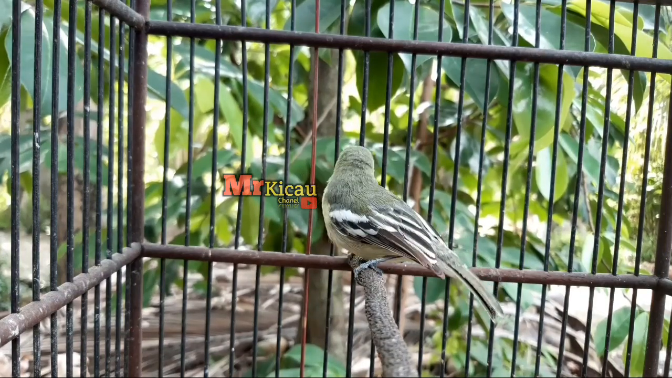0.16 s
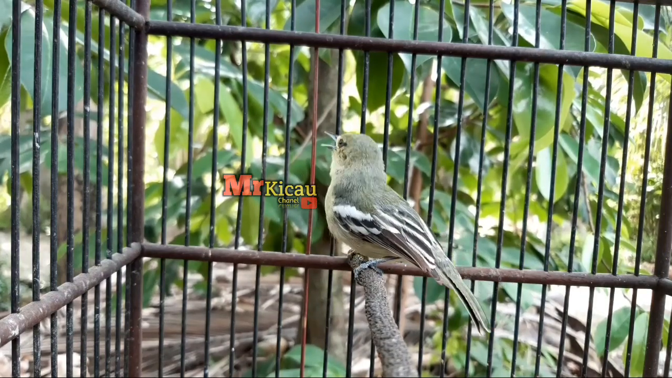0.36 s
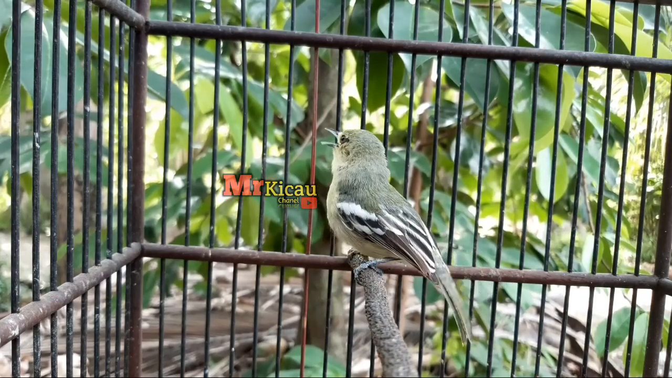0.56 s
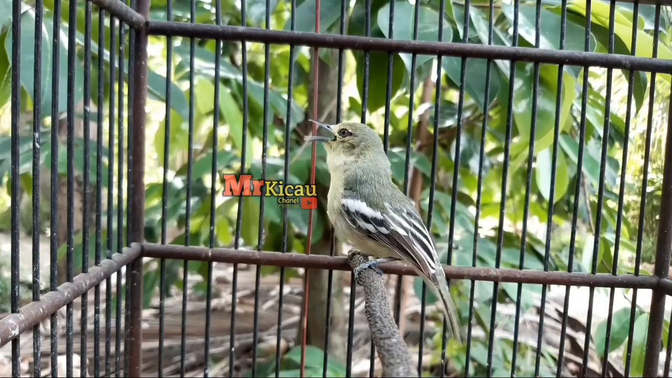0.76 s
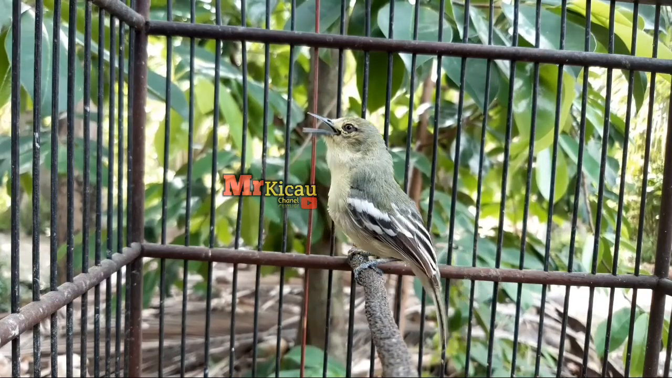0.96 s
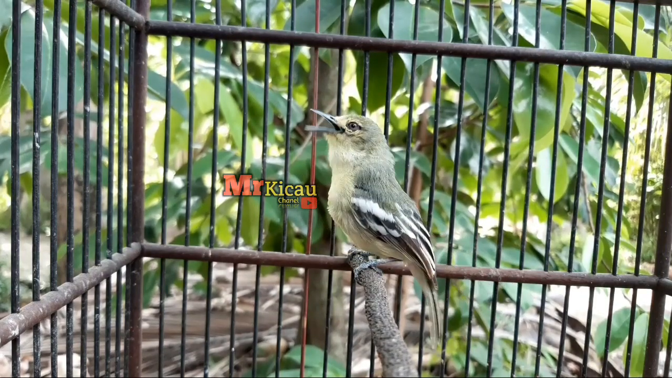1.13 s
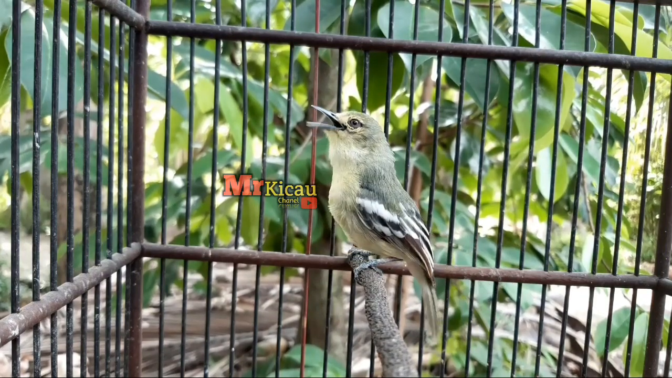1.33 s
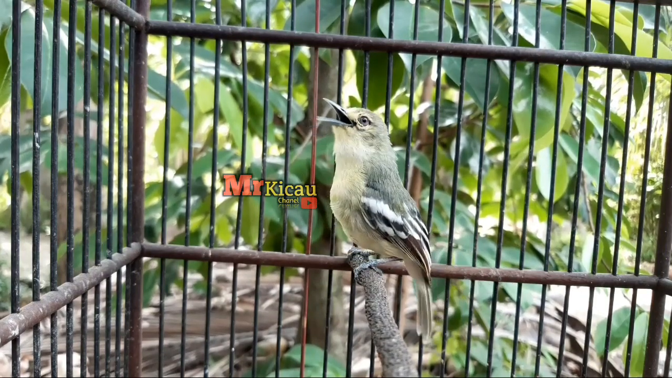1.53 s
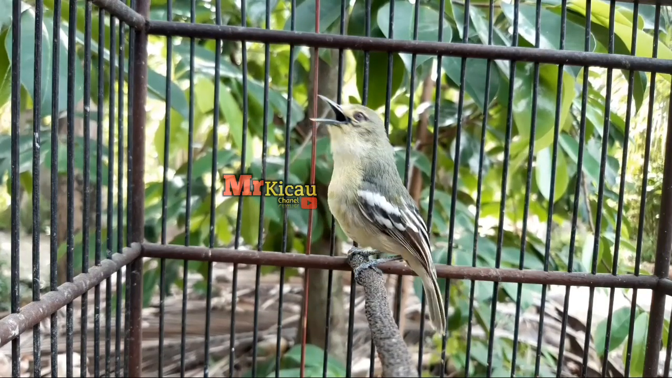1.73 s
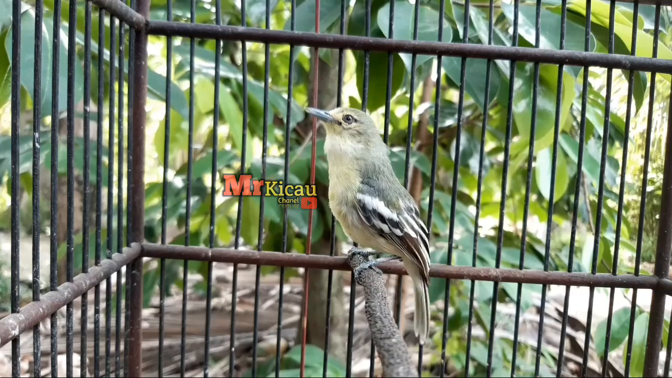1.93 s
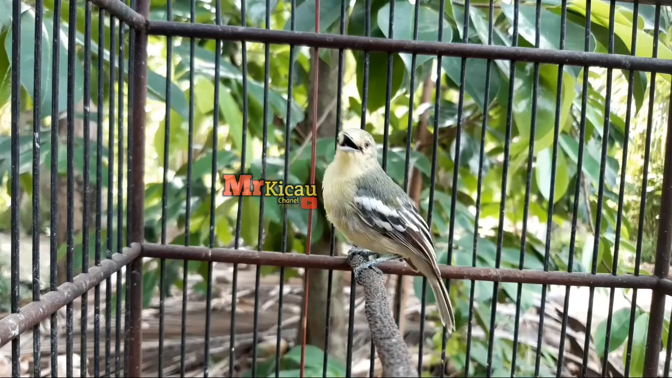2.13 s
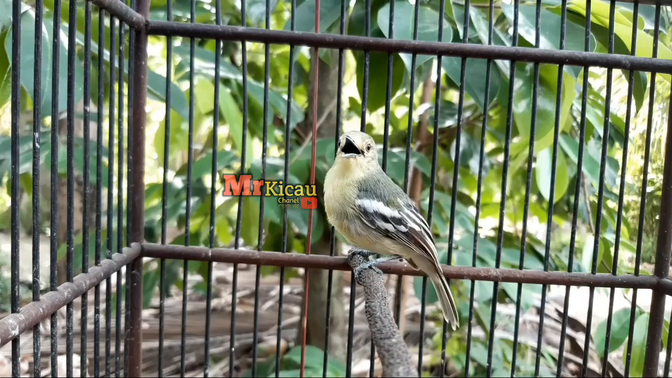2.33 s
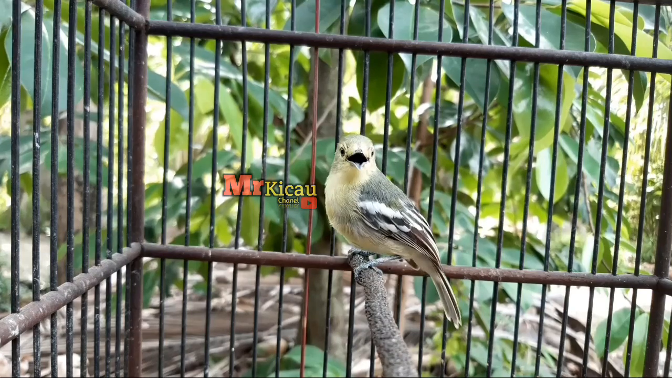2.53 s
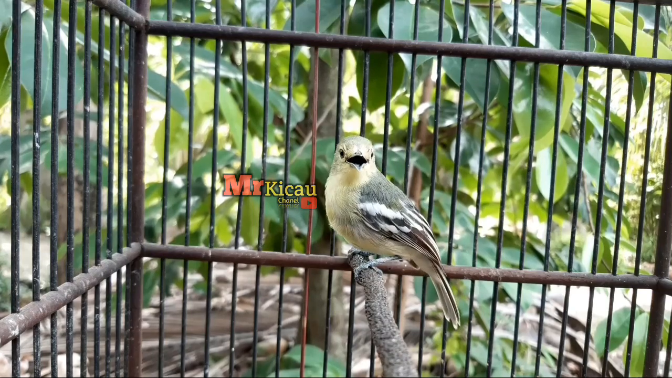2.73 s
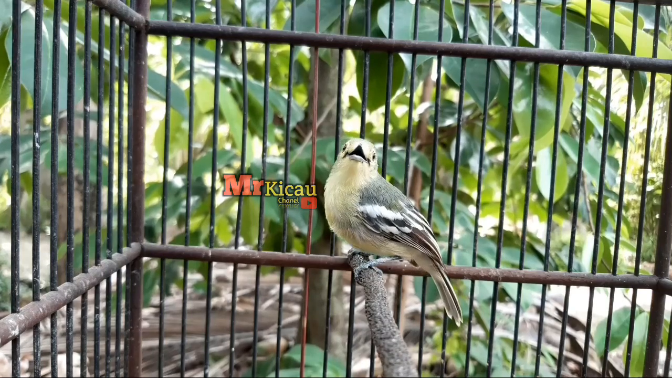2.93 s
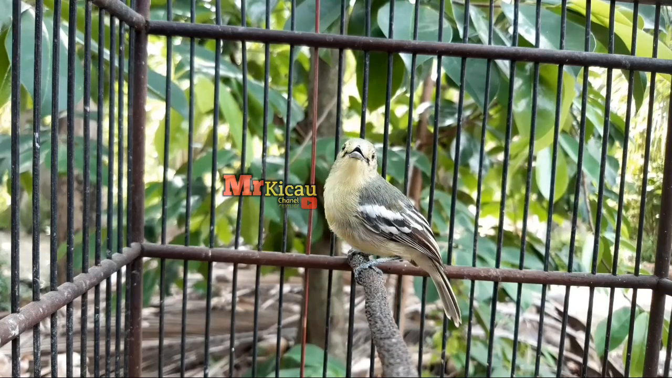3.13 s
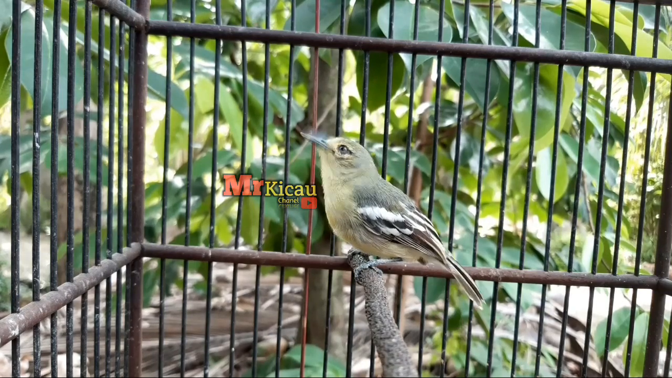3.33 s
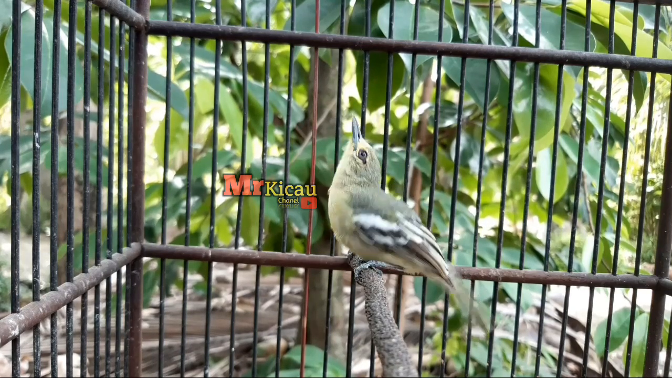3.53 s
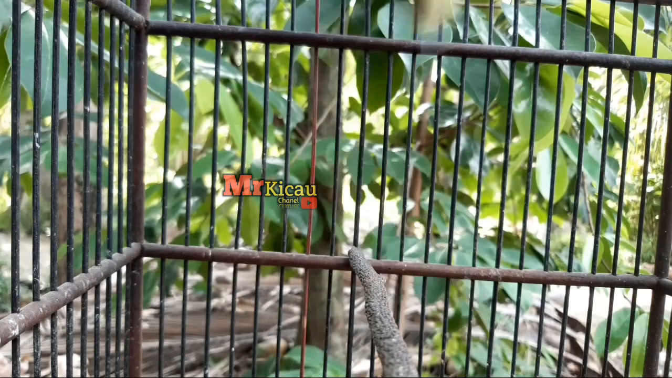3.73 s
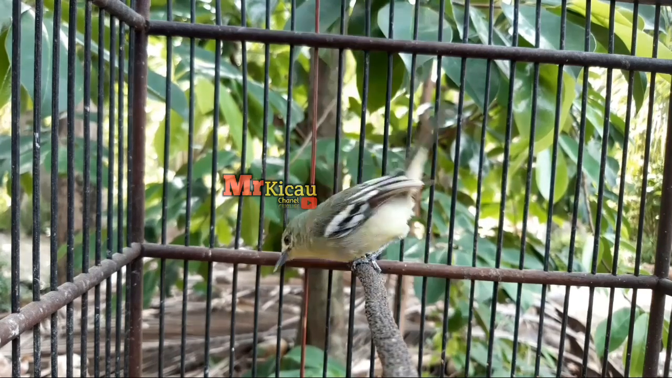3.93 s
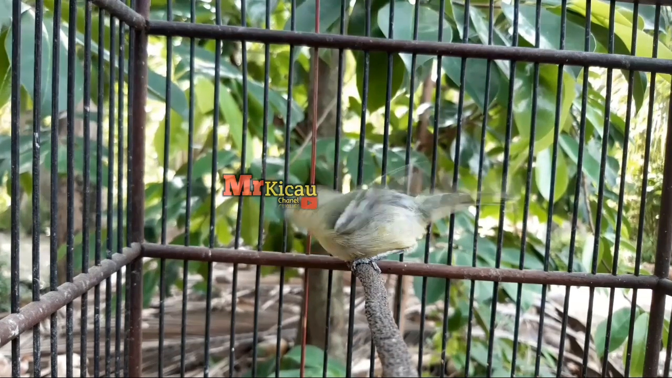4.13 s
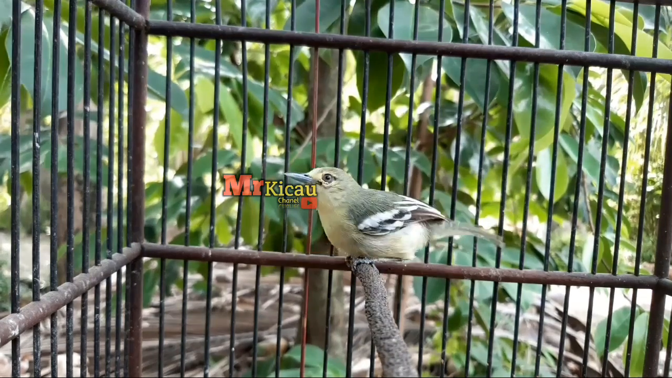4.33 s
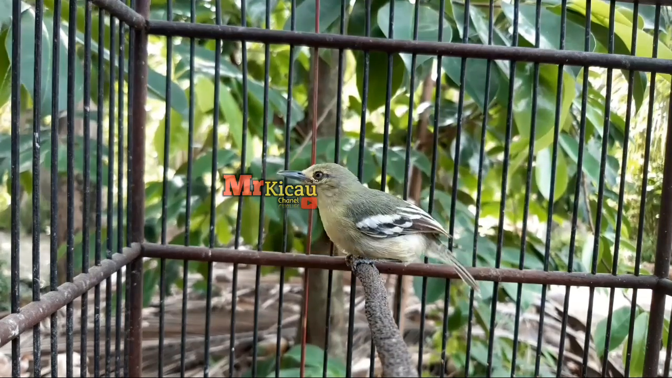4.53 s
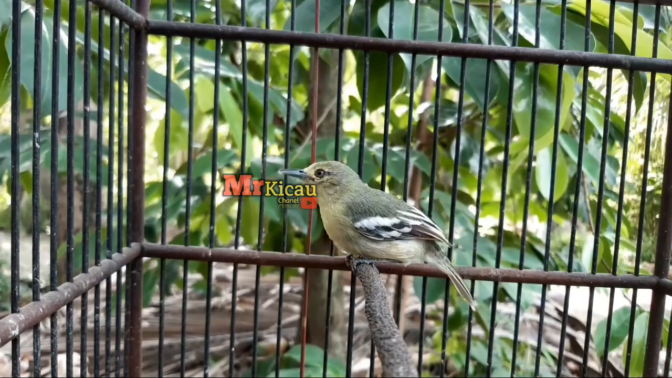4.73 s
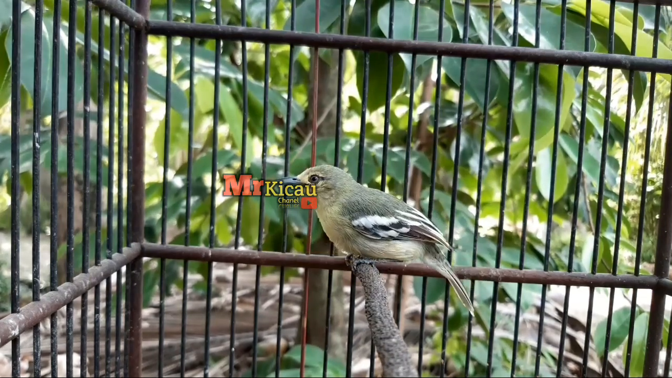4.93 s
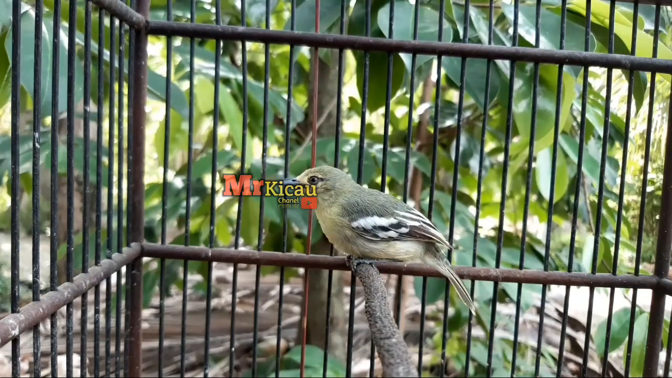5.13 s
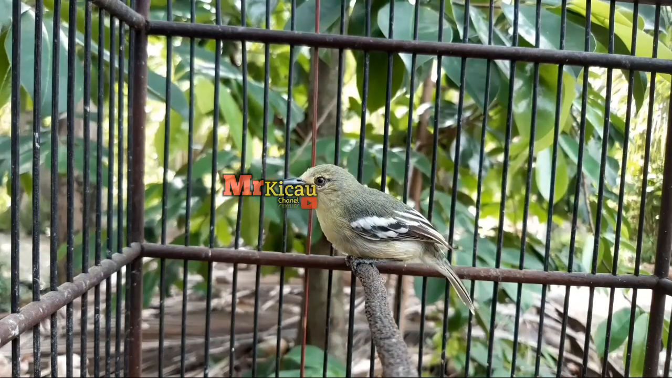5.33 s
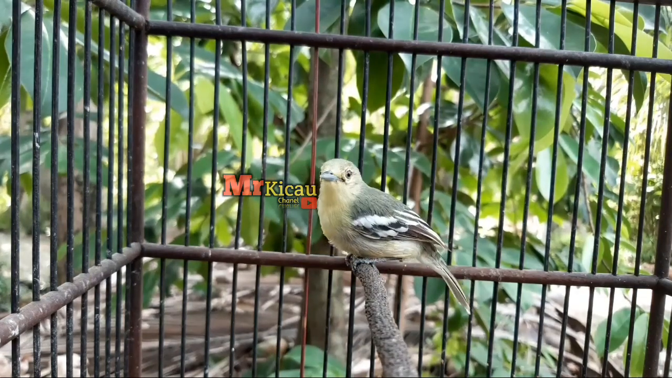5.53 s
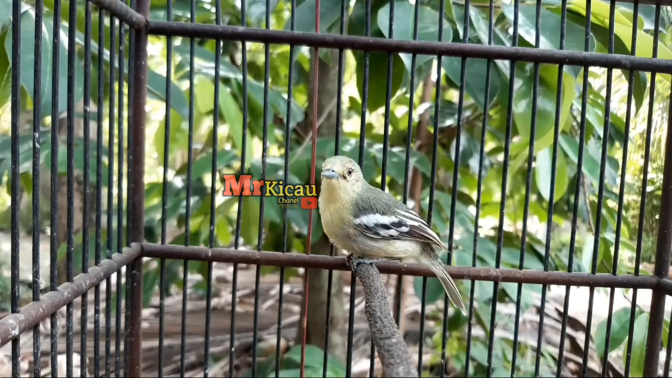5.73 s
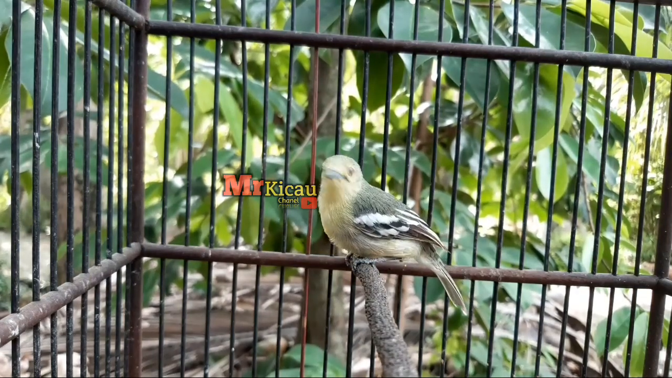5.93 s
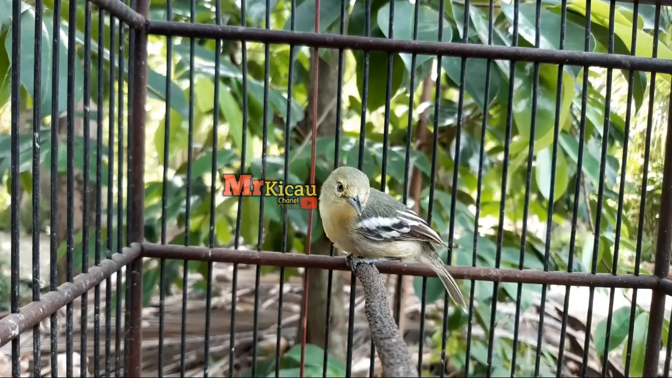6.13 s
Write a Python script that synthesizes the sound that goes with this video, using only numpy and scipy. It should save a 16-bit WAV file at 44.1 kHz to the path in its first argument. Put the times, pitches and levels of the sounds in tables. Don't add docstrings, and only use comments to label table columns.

```python
import sys
import numpy as np
from scipy import signal
from scipy.fft import rfft, irfft, next_fast_len
from scipy.io import wavfile
from scipy.ndimage import uniform_filter1d, map_coordinates

SR = 44100
rng = np.random.default_rng(int(sys.argv[2]) if len(sys.argv) > 2 else 0)


def undo_db(level):
    steps = np.asarray(level, float) / 20
    return 10 ** steps


def wav_record(signal):
    frames = np.transpose(np.atleast_2d(signal))
    bounded = np.clip(frames, -1, 1)
    quanta = np.round(bounded * 32767).astype(np.int16)
    wavfile.write(sys.argv[1], SR, quanta)


N = 272538
TOP_HZ = 15750

# start_s, length_s, peak_db
TRILL_NOTES = [(0.186, 0.029, -37.5), (0.245, 0.033, -26), (0.302, 0.037, -22), (0.361, 0.034, -17.5),
               (0.421, 0.032, -14), (0.478, 0.033, -14.5), (0.538, 0.032, -15), (0.593, 0.034, -14.5),
               (0.649, 0.035, -14), (0.708, 0.034, -12.5), (0.765, 0.035, -12), (0.823, 0.035, -12),
               (0.881, 0.034, -11.5), (0.933, 0.04, -12.5), (0.991, 0.039, -10.5), (1.046, 0.039, -11.5),
               (1.101, 0.039, -10.5), (1.16, 0.041, -10.5), (1.219, 0.037, -10), (1.271, 0.04, -10.5),
               (1.331, 0.038, -9), (1.388, 0.038, -10.5), (1.443, 0.038, -10.5), (1.503, 0.037, -10),
               (1.555, 0.044, -10.5), (1.614, 0.04, -10.5), (1.671, 0.04, -11), (1.733, 0.027, -11)]
# time_s, pitch_hz
TRILL_PITCH = [(.19, 2640), (.25, 2684), (.42, 2584), (.55, 2622), (.83, 2640), (1.1, 2613), (1.68, 2586),
               (1.74, 2592)]
NOTE_BEND = [(0, 1.004), (.35, 1.007), (1, .987)]
# time_s, pitch_hz, level_db, overtone_db
SLIDE = [
    (1.846, 2402, -35, -56),
    (1.858, 2412, -19.5, -48.5),
    (1.889, 2199, -16.5, -42.5),
    (1.94, 1904, -13.5, -40),
    (1.975, 1665, -24, -39),
    (2.03, 1238, -38.5, -48),
    (2.073, 943.5, -48, -41),
    (2.096, 740, -64, -47),
]
# freq_hz, level_db
THROAT = [(1200, -8), (1900, 7), (3000, 4), (4500, -2), (5400, -14), (7000, -11), (8500, -12), (10800, -22),
          (12900, 3), (14500, -3), (15600, -18)]
# freq_hz, level_db (per Hz)
BREATH = [(1100, -20), (1700, 0), (2600, 9), (3400, 4), (4300, -16), (6500, -14), (9000, -26), (11500, -14),
          (13500, -4), (15500, -5)]
# start_s, length_s, first_hz, last_hz, level_db
NEIGHBOUR = [
    (.03, 0.037, 3600, 3330, -42),
    (.188, 0.2, 3947, 3999, -32),
    (0.262, 0.075, 3430, 3340, -29),
    (.345, .05, 3353, 3260, -35.5),
    (0.791, 0.11, 2540, 1720, -52),
]
# start_s, length_s, first_hz, last_hz, level_db
HIDDEN = [
    (0, 0.006, 3360, 3446, -23.5),
    (0, 0.013, 2710, 2090, -49),
    (0.045, 0.1, 2590, 2530, -63.5),
    (0.409, 0.033, 3430, 3305, -37),
    (0.421, 0.076, 3306, 2087, -36),
    (0.495, .12, 2050, 2227, -57),
    (0.645, 0.04, 3950, 3852, -40),
    (0.668, 0.05, 3905, 2898, -35),
    (0.723, 0.075, 3240, 2887, -41),
]
# start_s, length_s, first_hz, last_hz, level_db
DISTANT = [
    (3.875, 0.093, 2856, 2640, -54),
    (3.995, 0.085, 2790, 2645, -52),
    (4.11, 0.073, 2850, 2490, -51),
    (4.25, 0.11, 2870, 2305, -53.5),
    (4.415, 0.11, 2680, 2315, -52.5),
    (4.56, .125, 2664, 2190, -55.5),
    (4.75, .045, 2380, 2280, -56),
    (4.79, .075, 2250, 1760, -57.5),
    (4.946, 0.093, 3370, 3810, -53.5),
]
# start_s, length_s, first_hz, last_hz, level_db
DOVES = [
    (.3, 0.28, 493, 479, -55.5),
    (.55, 0.21, 492, 484, -56.5),
    (1.366, 0.059, 546, 539, -56),
    (4.007, 0.17, 224, 228, -46.5),
    (4.15, 0.089, 220, 223, -57),
    (4.93, 0.15, 1150, 1154, -70),
]
# freq_hz, width_hz, level_db
FRAME = [(264, 36, -9.5), (419, 154, -7.5), (787, 450, -6.5), (1530, 140, -2.5), (1840, 350, 1),
         (3600, 340, -9.5), (3300, 2100, -9.5)]
PERCH = [(329, 80, -3.5), (770, 147, -6.5), (995, 130, -1.5), (1310, 237, -6), (3480, 330, -11)]
TRAY = [(386, 360, -1.3), (780, 360, -0.59), (1290, 710, -0.74)]
HOOK = [(303, 370, -10.5), (819.5, 313, -1), (4000, 4800, -8.5)]
DOOR = [(654, 310, -12.5), (1760, 530, 0)]
CUP = [(865, 170, 0)]
WIRE = [(4001, 1000, 0)]
# cage part, start_s, level_db, shake_s, t60_s (time to fall by 60 dB)
JOLTS = [
    (WIRE, .44, -62, 0.15, .2),
    (WIRE, .65, -62, .1, .19),
    (HOOK, 1.55, -46.5, 0.05, .48),
    (FRAME, 3.269, -46, 0.057, .45),
    (PERCH, 3.79, -50, .022, .11),
    (TRAY, 3.935, -51.5, 0.072, 0.58),
    (CUP, 4.2, -63, .12, 0.18),
    (DOOR, 4.3, -71, .05, .38),
    (TRAY, 5.73, -58, .015, .08),
    (DOOR, 6.165, -37.5, .04, .44),
]
# start_s, peak_db
TICKS = [
    (3.711, -53),
    (3.7908, -42.5),
    (3.8019, -51),
    (3.8561, -49),
    (3.8747, -51),
    (3.9326, -47),
    (3.9494, -46.5),
    (5.459, -50.5),
    (5.7361, -51.5),
]
# start_s, rise_s, level_db, hold_s, t60_s
STIRS = [(0, 0.0011, -69.5, 0.013, 1.2), (.37, .05, -65, 0.0089, 1.15), (0.549, 0.086, -75, 1.1, 0.96),
         (0.623, 0.047, -65.5, .01, 0.87), (1.511, 0.055, -71.5, 0.0085, 1.6),
         (3.261, 0.019, -51, 0.011, 0.55), (3.461, .015, -50, 0.053, .6), (3.9, .06, -62, 0.0084, 1),
         (4.109, .015, -63, 0.0089, 0.92), (4.351, 0.016, -64, 0.012, 0.69),
         (5.457, 0.011, -55, 0.045, 1.5), (5.502, .24, -50.5, 0.098, 0.63), (5.796, 0.11, -43, .01, 0.71),
         (5.852, .1, -48.5, .3, .5)]
# freq_hz, level_db (per Hz)
LEAF_COLOUR = [(530, -36), (900, -10.5), (1290, -6), (2660, -0.5), (3600, -0.5), (8000, -3), (12000, -2),
               (15000, -5.5), (15700, -11)]
# time_s, firings_per_s, level_db
ENGINE = [(0.0, 20.0, -52.5), (0.55, 18.1, -52), (0.8, 17.7, -54), (1.46, 18.1, -58), (1.74, 17.5, -60),
          (2.01, 20.0, -57.5), (2.9, 18, -59.5), (3.2, 18.8, -55.5), (3.45, 18.2, -52.5), (3.9, 19.9, -52),
          (4.3, 19.5, -51), (4.66, 18.7, -48), (5.3, 18.7, -48.5), (5.83, 19.0, -44), (6.18, 19.0, -44.5)]
# freq_hz, level_db (per Hz)
EXHAUST = [(18, -61), (30, -31), (43, -22), (79, -8), (97, 1), (156, -14.5), (208, -12), (275, -15.5),
           (322, -14.5), (377, -20), (700, -37.5), (910, -68), (1540, -120)]
# freq_hz, level_db (per Hz)
AIR = [(260, -35), (450, -6.5), (864, -6.5), (973, -12), (2830, -21.5), (6490, -25.5), (7090, -24),
       (7750, -21), (10600, -34), (15600, -26)]
# time_s, level_db
BREEZE = [(0.0, -78.5), (0.5, -71.5), (1.29, -76), (1.65, -76.5), (2.27, -86), (3.25, -83), (3.44, -69),
          (3.77, -77.5), (4.01, -69), (4.37, -76.5), (5.39, -77), (5.83, -68), (6.18, -73)]
# freq_hz, width_hz, level_db
INSECTS = [
    (6430, 690, -78.5),
    (7735, 120, -83),
]
# freq_hz, likeness (1 = the same)
ALIKE = [(60, 0.98), (180, 0.93), (550, 0.22), (1650, -0.06), (4970, 0.079), (15000, 0.3)]


def unit(x):
    return x / np.sqrt(np.mean(x ** 2) + 1e-20)


def along(points, hz):
    f, v = np.transpose(points)
    return np.interp(np.log(hz + 1), np.log(f + 1), v)


def curves(rows):
    s, *cols = np.transpose(rows)
    return [np.interp(np.arange(N) / SR, s, c) for c in cols]


def wobble(rate):
    knots = rng.standard_normal(int(N * rate / SR) + 4)
    return map_coordinates(knots, [np.arange(N) * rate / SR])


def filtered(x, response):
    m = next_fast_len(x.shape[-1] + SR // 10)
    return irfft(rfft(x, m) * response(np.fft.rfftfreq(m, 1 / SR)), m)[..., :x.shape[-1]]


def resonance(hz, width):
    return lambda f: 1j * f * width / (hz * hz - f * f + 1j * f * width)


def add(out, s, x):
    part = out[..., round(s * SR):][..., :x.shape[-1]]
    part += x[..., :part.shape[-1]]


def rush(spectrum):
    def shares(hz):
        turn = np.arccos(np.clip(along(ALIKE, hz), -1, 1)) / 2
        return undo_db(along(spectrum, hz)) * [np.cos(turn), np.sin(turn)]

    mid, side = filtered(rng.standard_normal((2, N)), shares)
    return unit(np.array([mid + side, mid - side]))


def echoes(x, t60, gap_s):
    t = np.arange(SR // 2) / SR
    tail = rng.standard_normal((2, len(t))) * undo_db(-60 * t / t60) * (t > gap_s)
    return signal.fftconvolve(np.atleast_2d(x), tail / np.linalg.norm(tail[0]), axes=1)[:, :N]


def singer():
    out = np.zeros((2, N))
    add_trill(out)
    add_slide(out)
    out = at_ports(out)
    on_slide = np.arange(N) > round(SLIDE[0][0] * SR)
    breath = undo_db(-37.5 - 8 * on_slide) * uniform_filter1d(np.abs(out), size=90) * rush(BREATH)
    near = undo_db(-16.5) * echoes(out[0], t60=.13, gap_s=.006)
    far = undo_db(-35) * echoes(out[0], t60=.65, gap_s=.015)
    return out + breath + near + far


def add_trill(out):
    shake_db, shake_hz = .8 * wobble(160), 14 * wobble(120)
    crest = 0.62
    for s, length, db in TRILL_NOTES:
        pitch_hz = np.interp(s, *np.transpose(TRILL_PITCH))
        pan_db = -6.5 + 4 * s
        u = np.linspace(0, 1.1, round(1.1 * length * SR))
        v = np.clip((u - .09) / .96, 0, 1)
        rise = (v / crest) ** 0.77
        fall = 1 - (np.abs(v - crest) / (1 - crest)) ** 2.1
        size = np.convolve(np.where(v < crest, rise, fall), np.hanning(160) / 80, "same")
        bend_power = (length - .032) / .007 + max(-db - 16, 0) / 14
        bend = np.interp(u, *np.transpose(NOTE_BEND)) ** bend_power
        now = slice(round(s * SR), round(s * SR) + len(u))
        gain = undo_db(db + .5) * size ** np.clip(-db / 14, .75, 1.1) * undo_db(shake_db[now])
        over = undo_db(-28.5) * gain ** 1.59
        note = voice(pitch_hz * bend + shake_hz[now], gain, over, tilt_db=2.0, rough=0.14, count=7)
        add(out, s, note * undo_db([[pan_db / 2], [-pan_db / 2]]))


def add_slide(out):
    start, end = round(SLIDE[0][0] * SR), round(SLIDE[-1][0] * SR)
    hz, db, over_db = (uniform_filter1d(c[start:end], size=400) for c in curves(SLIDE))
    tilt_db = 11 * np.log2(2200 / hz)
    steps = np.arange(len(hz))
    edge = np.clip(np.minimum(steps, steps[::-1]) / (0.0012 * SR), 0, 1)
    add(out, SLIDE[0][0], edge * voice(hz, undo_db(db + 3.5), undo_db(over_db), tilt_db, rough=0.12, count=16))


def voice(hz, gain, over, tilt_db, rough, count):
    turns = 2 * np.pi * np.cumsum(hz) / SR
    k = np.arange(2, count)[:, None]
    sizes = undo_db(along(THROAT, k * hz) - tilt_db * np.log2(k / 2)) * (k * hz < TOP_HZ)
    flutter = unit(uniform_filter1d(rng.standard_normal((count, SR // 2)), size=24))[2:, :len(hz)]
    overtones = (sizes * (1 + rough * flutter) * np.sin(k * turns)).sum(axis=0)
    return gain * np.sin(turns) + over * overtones


def at_ports(x):
    lag_s, turn_rad = .000097, .22

    def both(f):
        left = 1 + 0.5 * resonance(2250, 90)(f)
        cancel = (1j * (f - 2222) - 8) / (1j * (f - 2222) + 35)
        return np.array([left, cancel * np.exp(-2j * np.pi * f * lag_s - 1j * turn_rad)])

    return filtered(x, both)


def far_birds():
    neighbour = whistles(NEIGHBOUR, direct=.8, ease=1.05)
    hidden = whistles(HIDDEN, direct=0.19, ease=1.05)
    distant = whistles(DISTANT, direct=0.81, ease=1.7)
    doves = whistles(DOVES, direct=0.68, ease=1.05)
    direct, scattered = neighbour + hidden + distant + doves
    close = echoes(direct, t60=.19, gap_s=0)
    return close + undo_db(6) * echoes(scattered, t60=.5, gap_s=0)


def whistles(rows, direct, ease):
    out = np.zeros(N)
    for s, length, first_hz, last_hz, db in rows:
        u = np.linspace(0, 1, round(length * SR))
        hz = last_hz + (first_hz - last_hz) * (1 - u) ** ease
        turns = 2 * np.pi * np.cumsum(hz) / SR
        tone = np.sin(turns) + undo_db(-29) * np.sin(2 * turns) + undo_db(-35) * np.sin(3 * turns)
        swell = np.abs(np.sin(np.pi * u ** .75)) ** .9
        add(out, s, undo_db(db) * swell * tone)
    return np.clip([[direct], [1 - direct]], 0, 1) * out


def cage():
    out = np.zeros((2, N))
    for part, s, db, shake, t60 in JOLTS:
        for hz, width, level in part:
            add(out, s, undo_db(db + level) * ringing(hz, width, shake, t60))
    out = out * undo_db(1.8 * wobble(90))
    for s, db in TICKS:
        add(out, s, undo_db(db + 2.5) * tick())
    return out


def ringing(hz, width, shake, t60):
    t = np.arange(SR // 2) / SR
    both, apart = rng.standard_normal((2, len(t)))
    spread = np.clip(hz / 900, 0, 1)
    ring = filtered(both + spread * np.array([apart, -apart]), lambda f: resonance(hz, width)(f) ** 2)
    return undo_db(-60 * np.maximum(t - shake, 0) / t60) * np.minimum(t / 0.003, 1) * unit(ring)


def tick():
    t = np.arange(SR // 2) / SR
    snap = filtered(rng.standard_normal((2, len(t))), resonance(7100, 14000))
    return snap * (undo_db(-60 * t / 0.014) + undo_db(-11.5 - 60 * t / 0.26))


def leaves():
    power = undo_db(2 * -95)
    t = np.arange(N) / SR
    for s, rise, db, hold, t60 in STIRS:
        swell = np.clip((t - s) / rise, 0, 1) ** 4
        fall_db = 60 * np.maximum(t - s - rise - hold, 0) / t60
        power = power + swell * undo_db(2 * (db - fall_db))
    crackle_db = 1.3 * wobble(300) + 0.67 * wobble(30)
    return np.sqrt(power) * unit(undo_db(crackle_db) * rush(LEAF_COLOUR))


def engine():
    rate, db = curves(ENGINE)
    turns = np.cumsum(rate * (1 + .01 * wobble(8))) / SR
    puffs = np.diff(np.floor(turns), prepend=0) * undo_db(1.9 * wobble(13))
    throb = unit(filtered(echoes(puffs, t60=.11, gap_s=0)[0], exhaust_pipe))
    near = np.clip((db + 60) / 15, .1, .85)
    return undo_db(db + 1.29) * (near * throb + np.sqrt(1 - near ** 2) * rush(EXHAUST))


def exhaust_pipe(hz):
    rings = 1 + .8 * resonance(102, 45)(hz) + 2.4 * resonance(320, 14)(hz) + .8 * resonance(222, 24)(hz)
    bass_cut = hz ** 2 / (hz ** 2 + 65 ** 2)
    return undo_db(along(EXHAUST, hz)) * rings * bass_cut / (1 + (hz / 290) ** 4)


def garden():
    level_db, = curves(BREEZE)
    out = undo_db(level_db + 11.5 + 1.1 * wobble(4)) * rush(AIR)
    for hz, width, db in INSECTS:
        buzz = filtered(rng.standard_normal((2, N)), lambda f: resonance(hz, width)(f) ** 2)
        out = out + undo_db(db + 2.2 * wobble(19)) * unit(buzz)
    return out


def scene():
    surroundings = far_birds() + cage() + leaves() + engine() + garden()
    return singer() + surroundings * undo_db([[-.8], [.8]])


def band_limit(x):
    return signal.sosfilt(signal.butter(12, 15710, fs=SR, output="sos"), x)


def record(dry):
    mix = filtered(dry, lambda hz: hz < TOP_HZ)
    return band_limit(mix)


dry = scene()
out = record(dry)
wav_record(out)
```